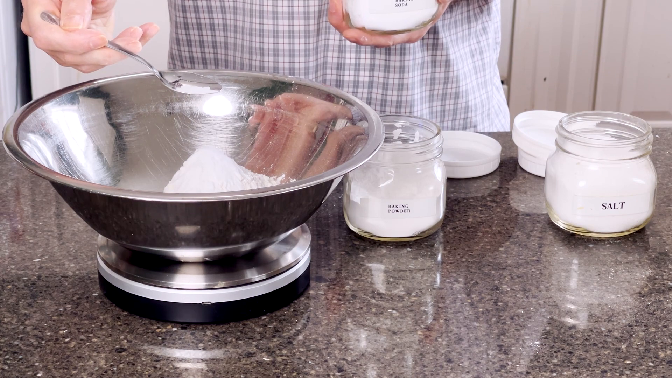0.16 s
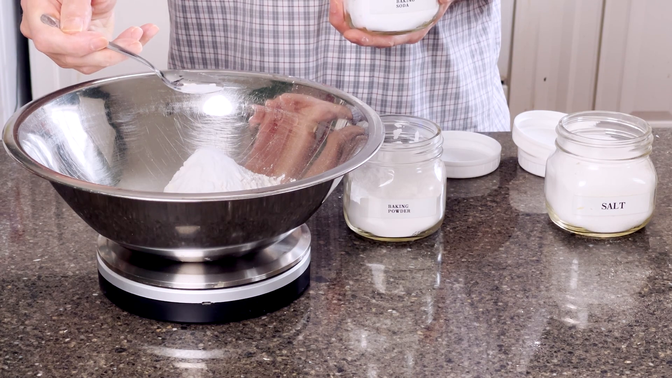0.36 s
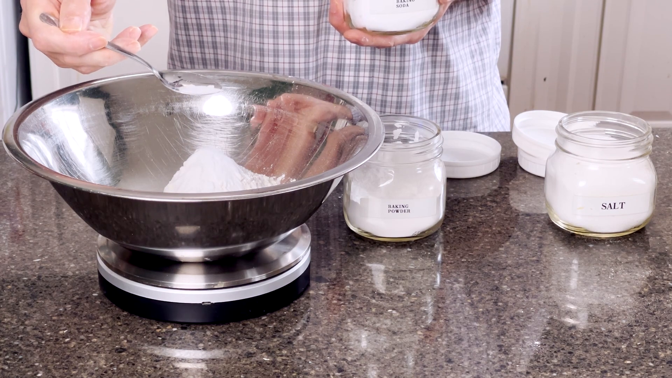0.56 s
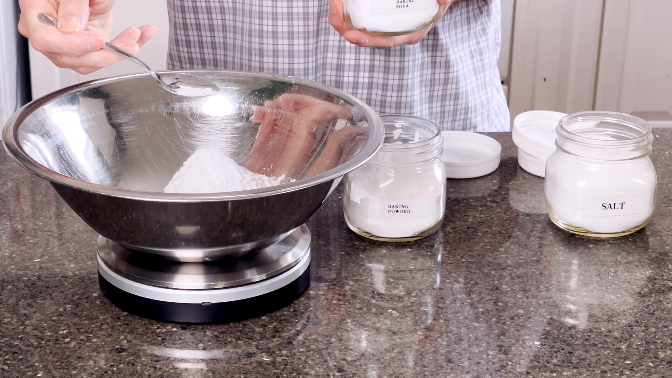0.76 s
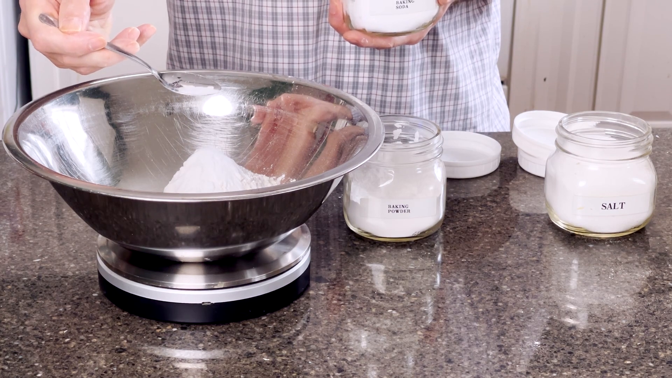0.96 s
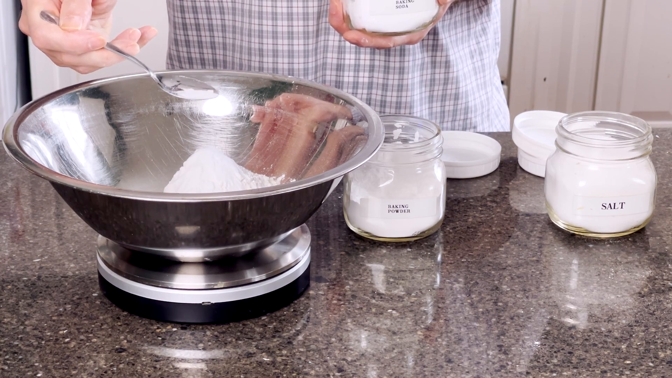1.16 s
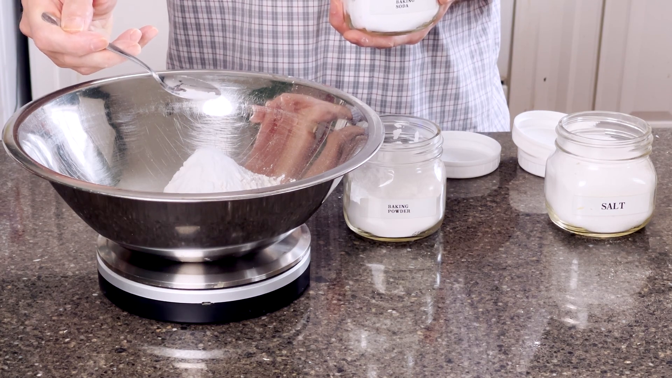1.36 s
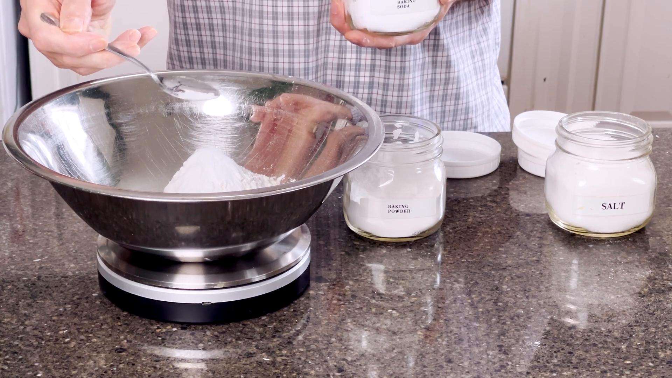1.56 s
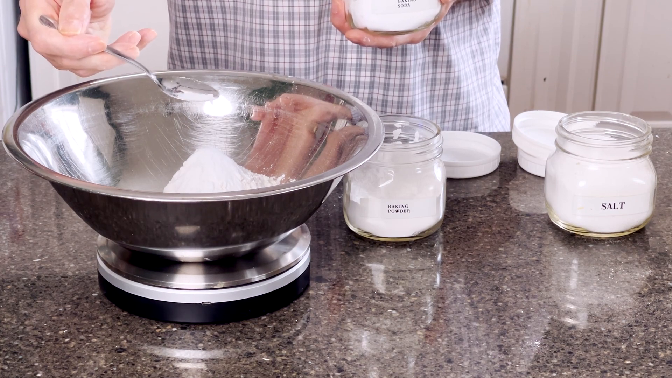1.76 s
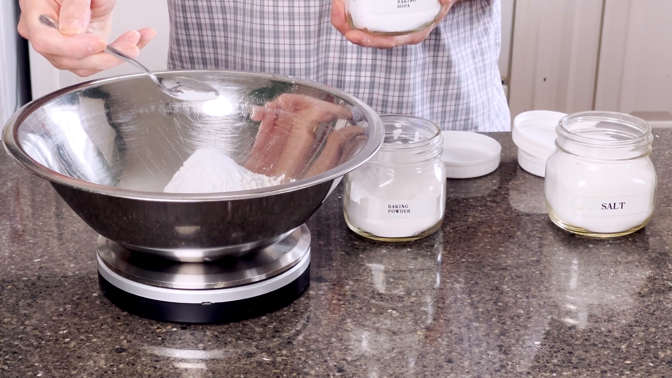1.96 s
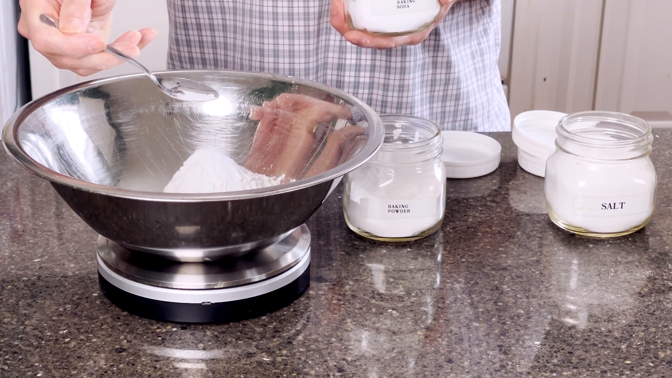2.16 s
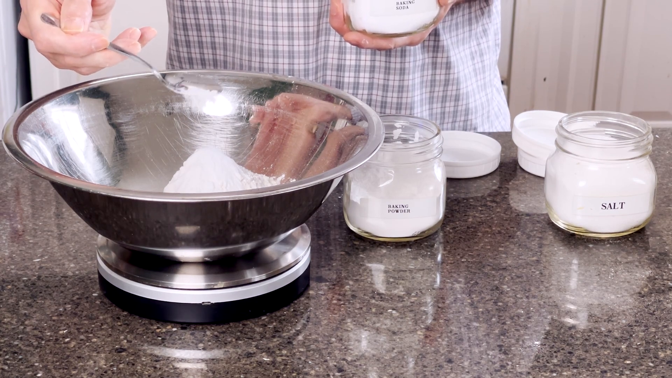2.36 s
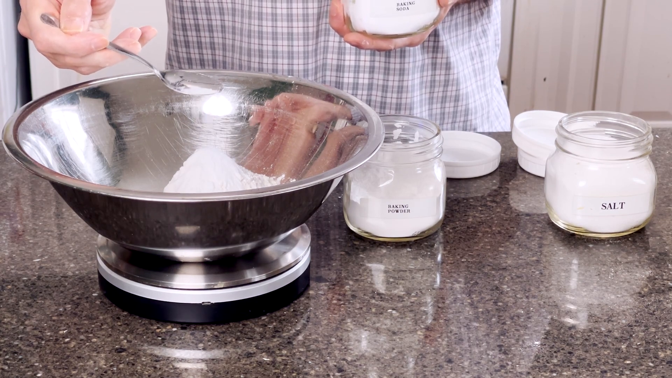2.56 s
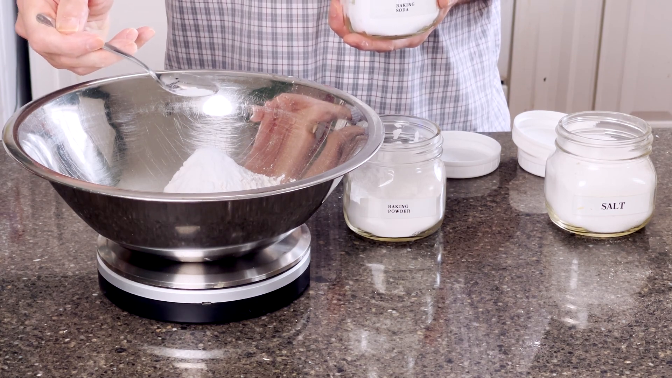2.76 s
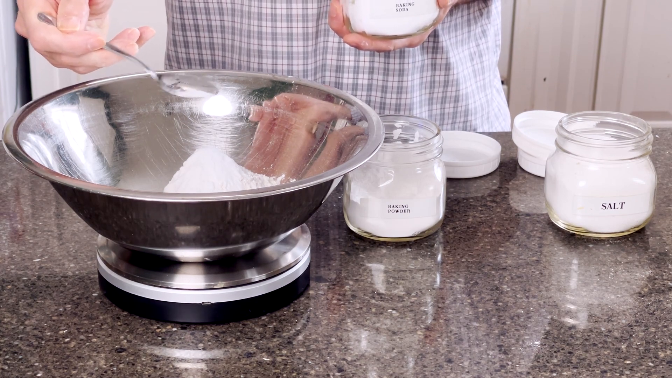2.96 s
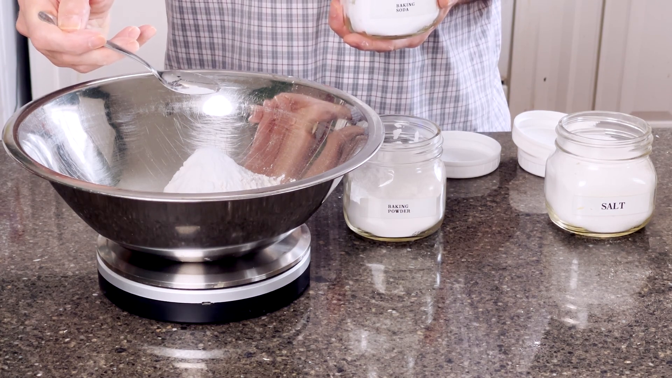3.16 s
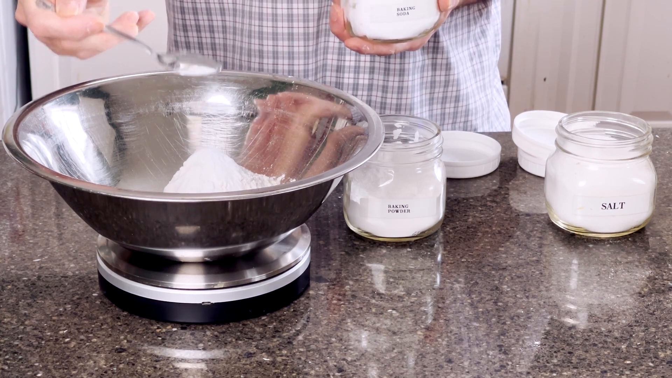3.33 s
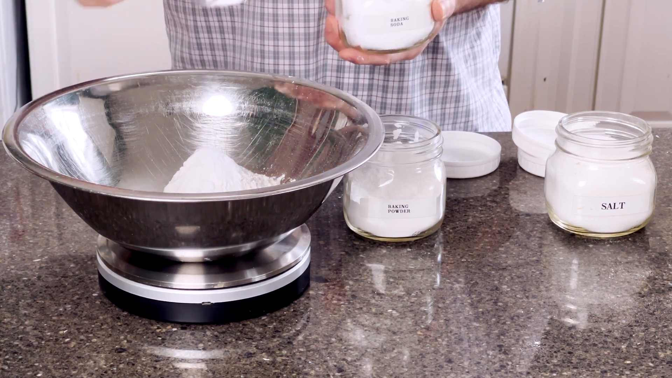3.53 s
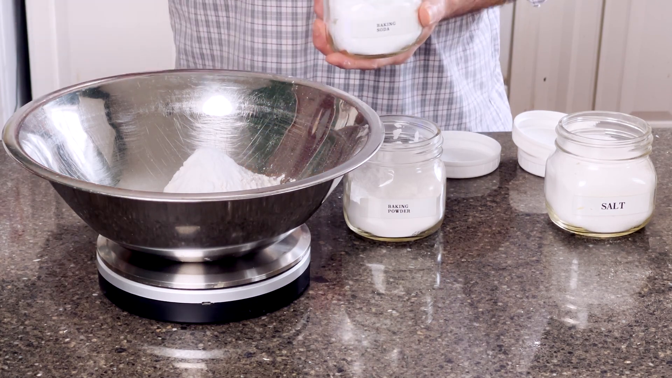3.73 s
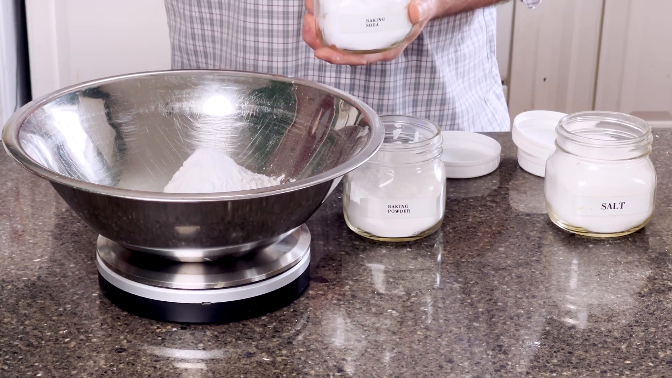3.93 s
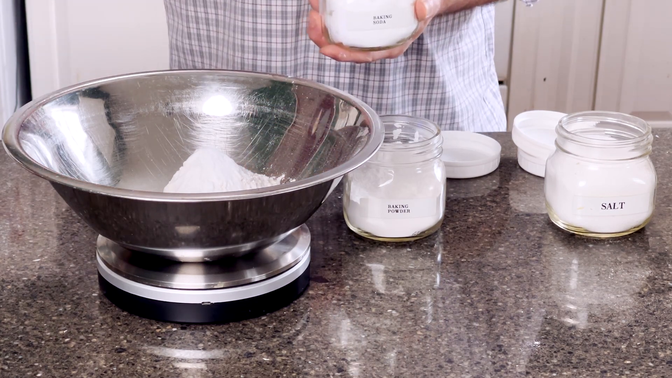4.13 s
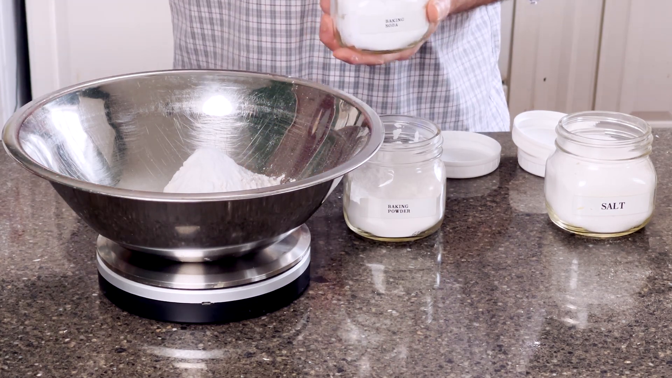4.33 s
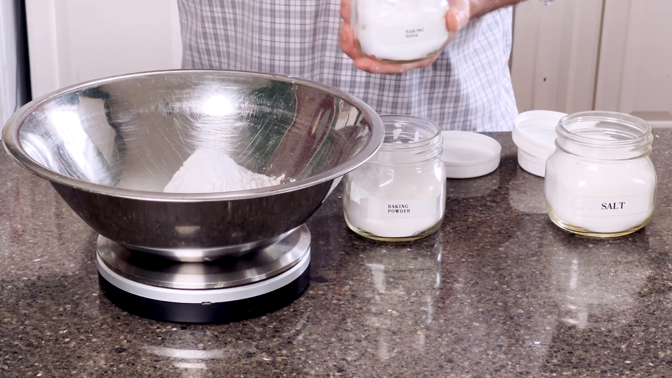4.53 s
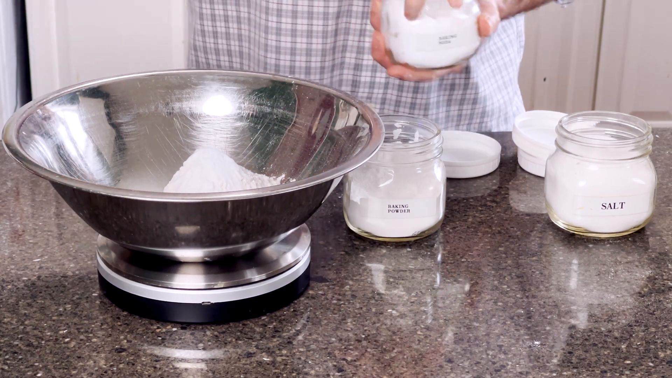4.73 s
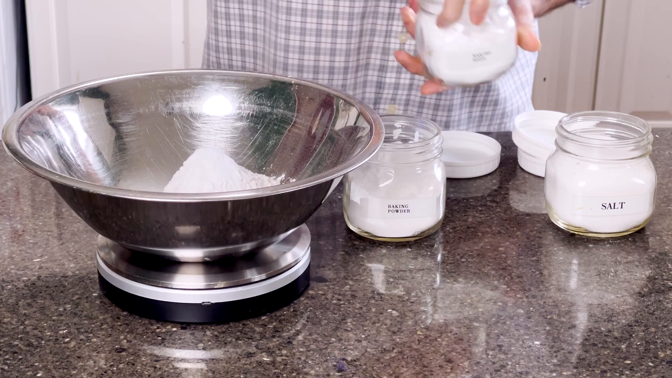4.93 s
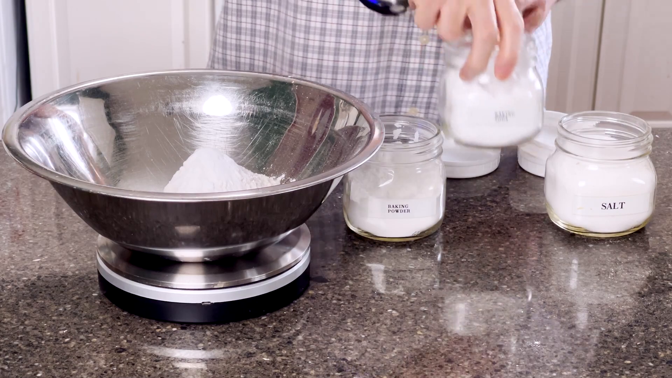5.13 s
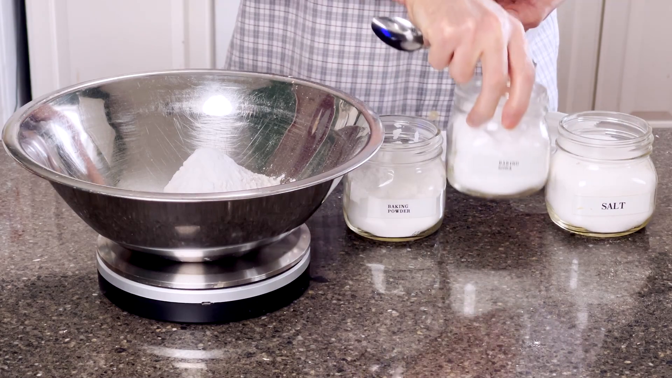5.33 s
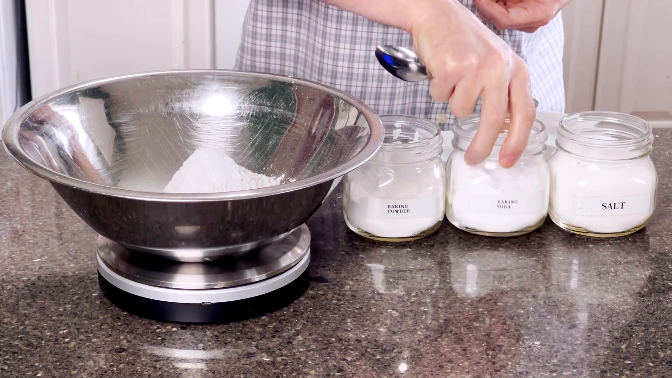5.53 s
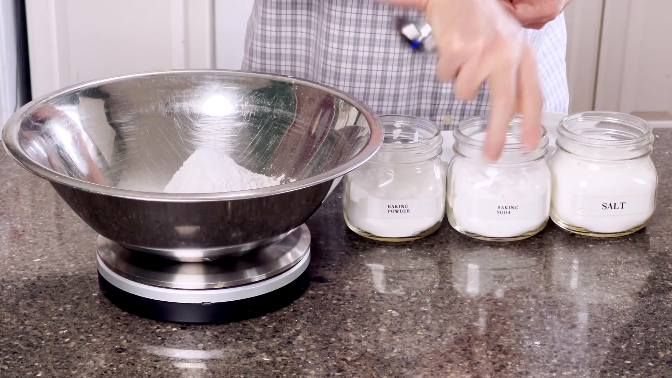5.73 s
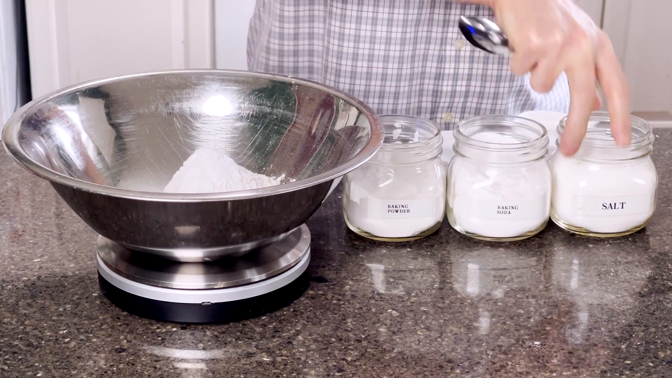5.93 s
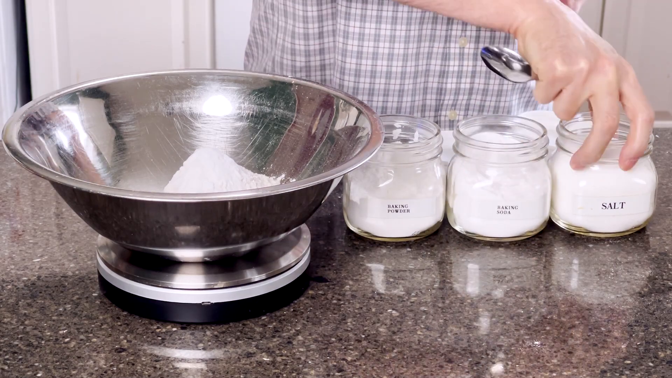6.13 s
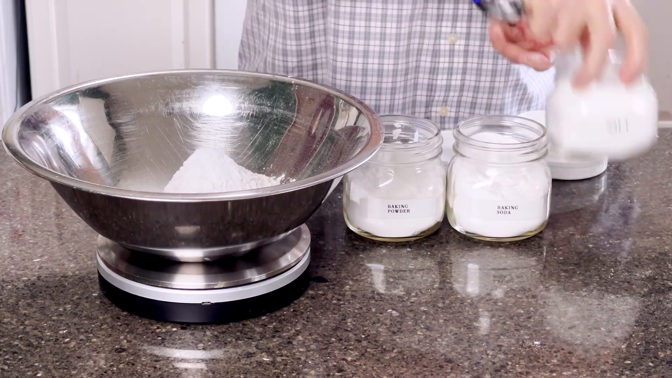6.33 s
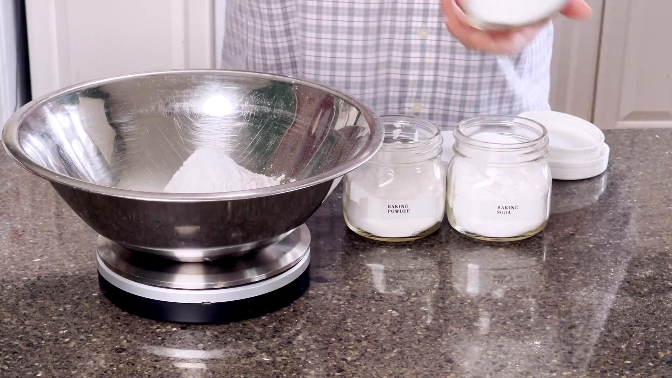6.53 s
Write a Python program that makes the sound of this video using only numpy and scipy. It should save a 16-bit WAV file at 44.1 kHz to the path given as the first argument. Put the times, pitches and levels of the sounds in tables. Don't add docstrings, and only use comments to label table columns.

```python
import sys
import numpy as np
from scipy import signal
from scipy.fft import rfft, irfft, next_fast_len
from scipy.io import wavfile
from scipy.ndimage import map_coordinates

SR = 44100
rng = np.random.default_rng(int(sys.argv[2]) if len(sys.argv) > 2 else 0)


def store_wav(level_fs):
    pcm = np.round(np.clip(np.atleast_2d(level_fs), -1, 1) * 32767)
    wavfile.write(sys.argv[1], SR, pcm.T.astype(np.int16))


def voltage_ratio(level):
    return 10 ** (np.asarray(level, float) / 20)


N = 295029


def unit(x):
    return x / np.sqrt(np.mean(x ** 2) + 1e-20)


def along(points, hz):
    f, v = np.transpose(points)
    return np.interp(np.log(hz + 1), np.log(f + 1), v)


def wobble(rate):
    knots = rng.standard_normal(int(N * rate / SR) + 4)
    return map_coordinates(knots, [np.arange(N) * rate / SR])


def filtered(x, response):
    size = next_fast_len(x.shape[-1] + 8192)
    spectrum = rfft(x, size) * response(np.fft.rfftfreq(size, 1 / SR))
    return irfft(spectrum, size)[..., :x.shape[-1]]


def diffuse(pair):
    # (frequency [Hz], coherence [-1 to 1])
    alike = [(60, 1), (130, 0.92), (290, 0.52), (700, 0.2), (1400, 0.44), (2400, 0.94), (4400, 0.63),
             (5300, 0.91), (7000, 1), (8700, 0.72), (9800, .99), (13000, 0.91)]

    def mid_side_gains(hz):
        angle = np.arccos(np.clip(along(alike, hz), -1, 1)) / 2
        return np.array([np.cos(angle), np.sin(angle)])

    mid, side = filtered(pair, mid_side_gains)
    return np.array([mid + side, mid - side])


def refrigerator():
    motor_hz = [47.9, 119.6, 189.3, 286, 334.5, 429.5, 524, 8710, 11830]
    # (level [dB rms], unsteadiness [0-1])
    hum = [(-54.5, 0.4), (-48, 0.05), (-54.5, 0.29), (-71, 0.26), (-64.5, .3), (-66.5, 0.4), (-69, 0.8),
           (-104, .3), (-104, 0.5)]
    t = np.arange(N) / SR
    port_sign = np.array([[1], [-1]])
    total = 0
    for hz, (db, loose) in zip(motor_hz, hum):
        strength = voltage_ratio(db + 2.5 + 3.7 * loose * wobble(3))
        drift = 3 * loose * wobble(1.99)
        port_phase = hz * 0.0006 * port_sign
        total = total + strength * np.cos(2 * np.pi * hz * t + drift + port_phase)
    return total


def ventilation():
    # (frequency [Hz], density [dB per Hz])
    duct = [(30, -26), (38, -22), (46, 9.5), (70, -1), (105, 7), (135, 1.5), (165, 6), (215, -2), (375, 1),
            (400, -3), (500, -7.5), (560, -10.5), (650, -11.5), (800, -10)]
    # (frequency [Hz], density [dB per Hz])
    hiss = [(800, -10), (1100, -16.5), (1700, -21.5), (2200, -28.5), (3300, -34.5), (3800, -43),
            (5000, -48), (7000, -50), (8700, -47), (9600, -50), (10400, -51.5), (11800, -46.5),
            (12100, -62), (17000, -81.5)]
    spectrum = duct[:-1] + hiss
    air = filtered(rng.standard_normal((2, N)), lambda hz: voltage_ratio(along(spectrum, hz)))
    level_db = -47.5 + 0.14 * wobble(1.814)
    return voltage_ratio(level_db) * unit(diffuse(air))


def rustle():
    # (peak time [s], peak level [dB], fade to -60 dB [s])
    brushes = [(4.41, -79, .4), (4.55, -80, .5), (4.672, -82, .4), (4.907, -79, .25), (5.24, -82, .4),
               (6.15, -87, .4), (6.516, -85, .5), (6.66, -66, .2)]
    # (start [s], end [s], level [dB])
    handling = [
        (3.42, 4.1, -90),
        (4.3, 5.3, -87),
        (5.88, 6.8, -86),
    ]
    # (frequency [Hz], density [dB per Hz])
    powder = [(2500, -30), (4300, 3), (5500, -8), (6800, -3), (7800, -5), (9000, 1), (10400, -3),
              (11800, 0), (12300, -5), (12800, -30), (15200, -11), (17000, -46)]
    rise_s, edge_s = 0.08, 0.08
    t = np.arange(N) / SR
    envelope = np.zeros(N)
    for peak_s, db, fade_s in brushes:
        envelope += voltage_ratio(db - 60 * np.maximum((peak_s - t) / rise_s, (t - peak_s) / fade_s))
    for start, end, db in handling:
        envelope += voltage_ratio(db) * np.clip(np.minimum(t - start, end - t) / edge_s, 0, 1)
    grains = rng.standard_normal((2, N)) * voltage_ratio(1.7 * wobble(150) + 1.5 * wobble(20))
    return envelope * unit(diffuse(filtered(grains, lambda hz: voltage_ratio(along(powder, hz)))))


def contact_force(t, chatter_ms, chatter_db):
    decay = voltage_ratio(chatter_db + 0.5 - 20 * t / (chatter_ms / 1000))
    force = decay * rng.standard_normal(len(t)) * (rng.random(len(t)) < 0.2)
    force[[0, 11]] = -0.4, 1
    return force


def struck(force, body):
    size = 8192
    hz = np.fft.rfftfreq(size, 1 / SR)
    power = 0
    for center, width, db in body:
        detuning = (hz - center * center / (hz + 1)) / width
        power = power + voltage_ratio(db) ** 2 / (1 + detuning ** 2) ** 2
    cepstrum = irfft(np.log(power + 1e-12) / 2)
    cepstrum[1:size // 2] *= 2
    cepstrum[size // 2 + 1:] = 0
    response = irfft(np.exp(rfft(cepstrum)))
    return signal.fftconvolve(force, response)[:len(force)]


def clear_rings(contact, t):
    ring_hz = 2335, 2405, 10810, 10930, 14700, 2500, 1000, 2085, 330, 750, 1395, 332, 750, 1395, 2425
    # (contact number, level [dB], t60 [s])
    rings = [(0, -24, .22), (0, -23, .22), (0, -18, .12), (0, -20, .12), (0, -24, .06), (2, -2, .09),
             (2, -10, .02), (4, -24, .16), (4, -30, .15), (4, -32, .15), (4, -30, .15), (6, -18, .12),
             (6, -18, .12), (6, -12, .1), (6, -18, .15)]
    choke_ms = {2: 6.3}
    ring = np.zeros(len(t))
    for hz, (hit, db, t60) in zip(ring_hz, rings):
        if round(hit) == contact:
            ring += voltage_ratio(db - 60 * t / t60) * np.sin(2 * np.pi * hz * t)
    onset = 1 - np.exp(-t / 0.0005)
    choke = voltage_ratio(-16 * np.clip(t * 1000 - choke_ms.get(contact, 999), 0, 1))
    return ring * onset * choke


def kitchen():
    # (frequency [Hz], t60 [s])
    decay_times = [(200, 0.92), (1000, 0.38), (2500, 0.34), (6000, .33), (11000, 0.23), (13500, .12),
                   (16000, 0.051)]
    hz, t, z = signal.stft(rng.standard_normal((2, SR * 3 // 4)), SR, nperseg=256)
    decay = voltage_ratio(-60 * t / along(decay_times, hz)[:, None])
    tail = signal.istft(z * decay, SR, nperseg=256)[1]
    s = np.arange(tail.shape[1]) / SR
    walls = np.clip((s - 0.003) / 0.0027, 0, 1)
    counter = np.clip(s / 0.00066, 0, 1) * voltage_ratio(8 - 60 * s / 0.038)
    tail = diffuse(tail * (walls + counter))
    return tail / np.linalg.norm(tail[0])


def knocks():
    times = [
        4.1742,
        4.1903,
        5.3341,
        5.5122,
        5.589,
        5.6767,
        5.7036,
        5.7083,
    ]
    # (peak level [dB], chatter decay [ms], chatter level [dB], room level [dB])
    hits = [(-16, 2.5, 3, -3), (-27, 1.9, 6, 5.5), (-14, 1.5, -4, -3), (-30, 3, 0.5, 0),
            (-2.5, 1.5, -12.5, -6), (-21, 2.5, 4, -9), (-19, 2, -1, -1), (-21, 1.2, -9.5, 3.5)]
    # (frequency [Hz], width [Hz], level [dB])
    spoon = [(700, 900, -26), (2350, 420, -13), (3250, 800, -15), (3800, 700, -21), (4850, 590, -23.5),
             (5350, 420, -15), (6400, 500, -21), (7520, 930, -9), (10350, 300, 4), (10900, 500, -2),
             (11400, 600, -9), (12300, 400, -16.5), (14700, 600, -20), (15500, 400, -30)]
    jar_on_jar = [(550, 260, -13.5), (790, 710, -6.5), (1150, 260, -14.5), (2000, 870, -15),
                  (2390, 780, -23), (2920, 600, -32), (3650, 500, -26), (4400, 400, -31), (6230, 800, -22),
                  (7500, 2500, -33), (9900, 950, -39), (11500, 850, -37)]
    touch = [(750, 800, -2), (1500, 470, -12), (2450, 310, -10), (3450, 860, -22), (4800, 600, -30),
             (6300, 700, -16), (8070, 960, -15.5), (9600, 390, -20), (11200, 1000, -19), (12700, 560, -20)]
    on_stone = [(230, 150, -20), (330, 50, -22), (560, 200, -13), (796, 266, 0), (1150, 600, 0),
                (2000, 550, 2), (3300, 1000, -12), (4500, 500, -25), (6320, 400, -22), (8500, 1300, -20),
                (10200, 1200, -38.5), (11600, 500, -31)]
    rim = [(692, 450, 4), (1400, 860, -3), (2500, 740, -15), (4600, 1200, -19), (6400, 500, -24),
           (8900, 1600, -2), (10600, 690, -11), (11200, 1100, -2), (13000, 500, -28)]
    rock = [(330, 110, -5.5), (760, 280, -3), (1340, 460, 2.5), (2130, 620, -10), (2900, 900, -8),
            (3700, 600, -18), (6230, 600, -21), (8700, 1000, -11), (10200, 700, -20), (11500, 500, -24)]
    settle = [(330, 230, -1), (600, 520, -7), (1070, 370, -5.5), (1910, 630, -8.5), (3030, 670, -14.5),
              (6350, 800, -48), (8600, 1500, -42)]
    bodies = spoon, spoon, jar_on_jar, touch, on_stone, rim, rock, settle
    out = np.zeros((2, N + SR))
    t = np.arange(SR // 8) / SR
    for k, (time, hit, body) in enumerate(zip(times, hits, bodies)):
        peak_db, chatter_ms, chatter_db, room_db = hit
        blow = struck(contact_force(t, chatter_ms, chatter_db), body)
        blow /= np.abs(blow).max()
        ring = clear_rings(k, t)
        into_room = blow + voltage_ratio(-7) * ring
        sound = voltage_ratio(room_db) * signal.fftconvolve(into_room[None], kitchen(), axes=1)
        sound[:, :len(t)] += blow + ring
        start = round(time * SR)
        sound = sound[:, :N + SR - start]
        out[:, start:start + sound.shape[1]] += voltage_ratio(peak_db) * sound
    return out[:, :N]


def scene():
    return refrigerator() + ventilation() + knocks() + rustle()


def low_pass(x):
    return signal.sosfilt(signal.butter(12, 16750, fs=SR, output="sos"), x)


def record(dry):
    # (frequency [Hz], gain [dB])
    mic_top = [(12300, 0), (13200, -12), (15800, -14), (16800, -40)]
    # (frequency [Hz], phase [rad])
    port_lead = [(8700, 0), (9400, -1.5), (10250, -np.pi), (11000, -4.6), (11800, -6.0),
                 (12600, -2 * np.pi)]

    def response(hz):
        half_gap = 0.5 * along(port_lead, hz) * np.array([[1], [-1]])
        return voltage_ratio(along(mic_top, hz)) * np.exp(1j * half_gap)

    return low_pass(filtered(dry, response))


dry = scene()
out = record(dry)
store_wav(out)
```